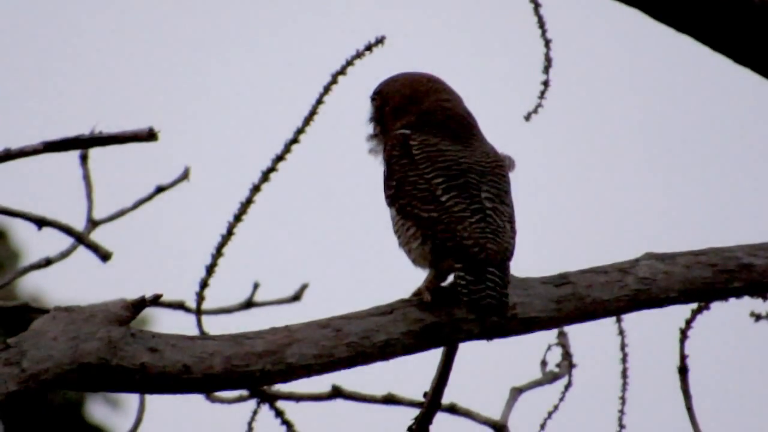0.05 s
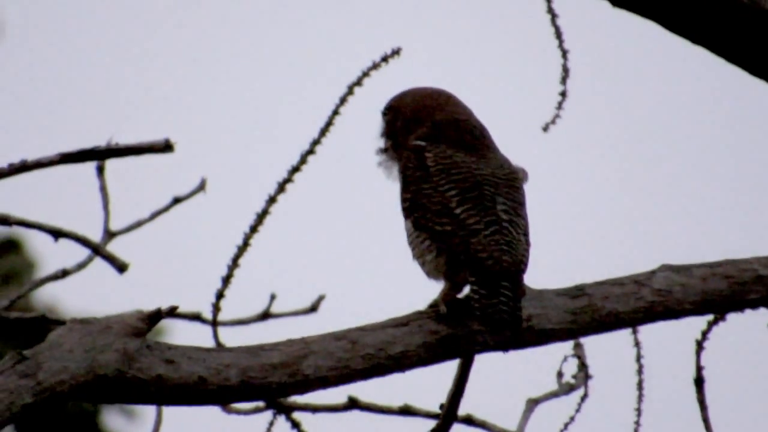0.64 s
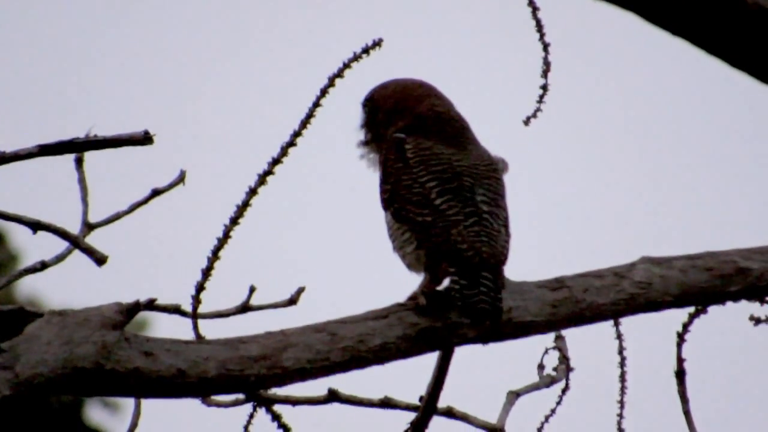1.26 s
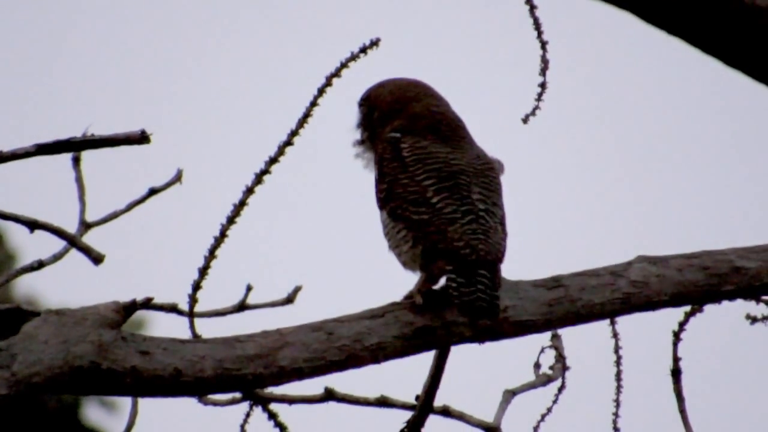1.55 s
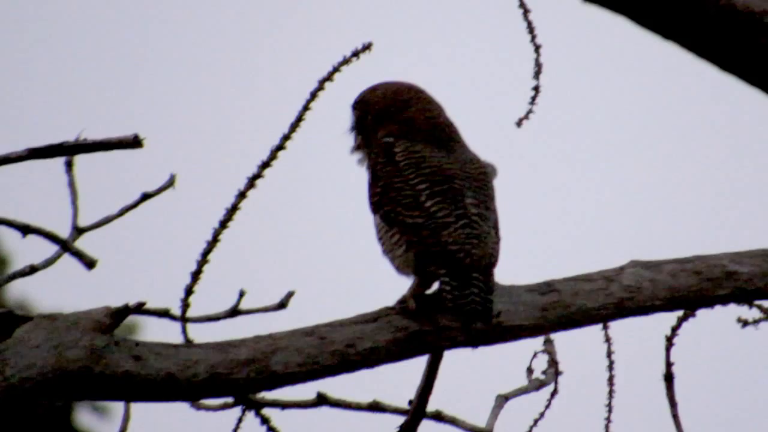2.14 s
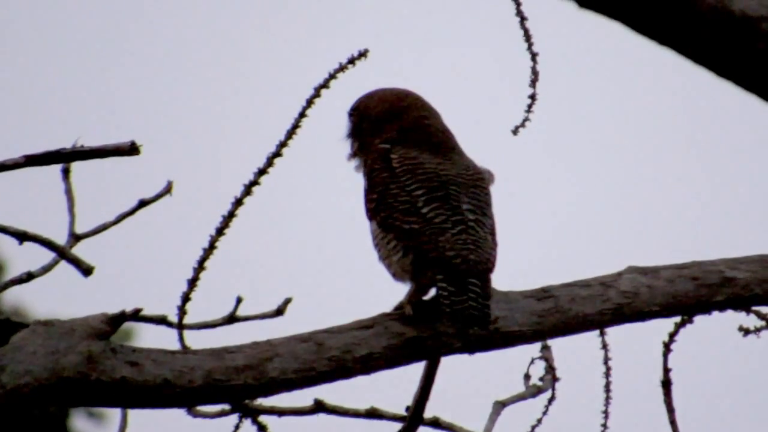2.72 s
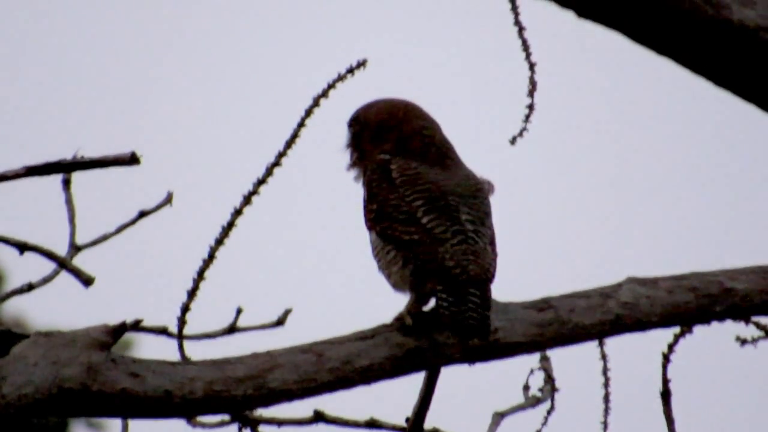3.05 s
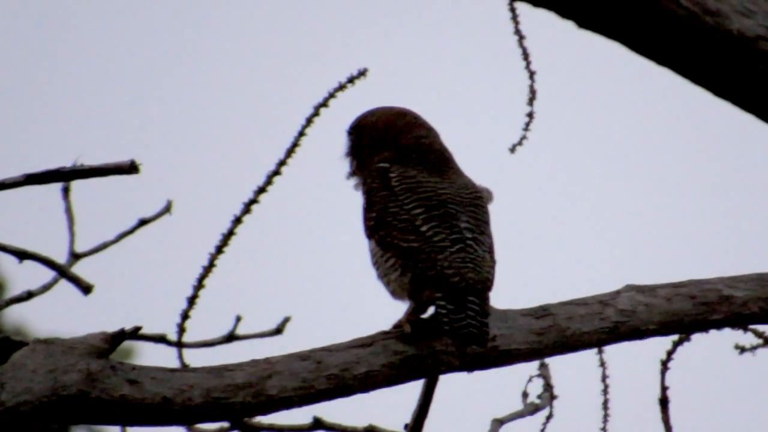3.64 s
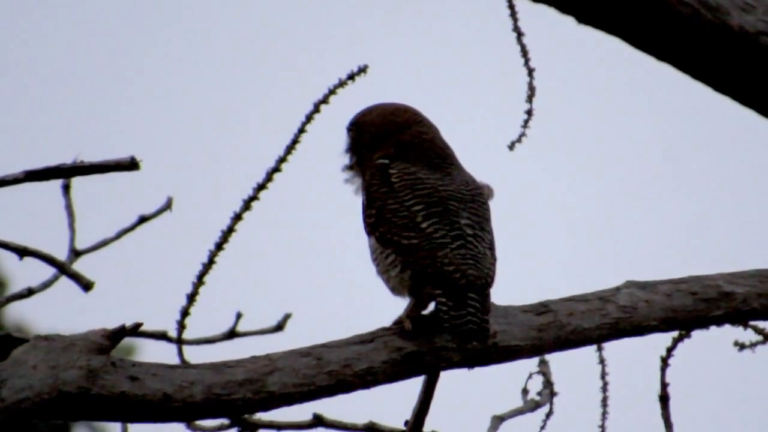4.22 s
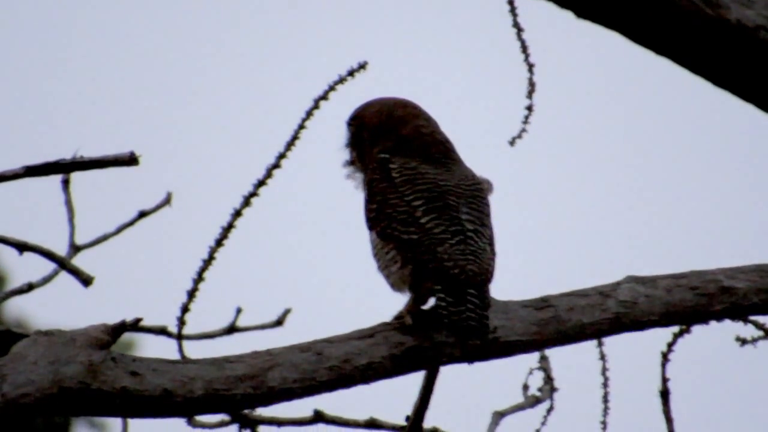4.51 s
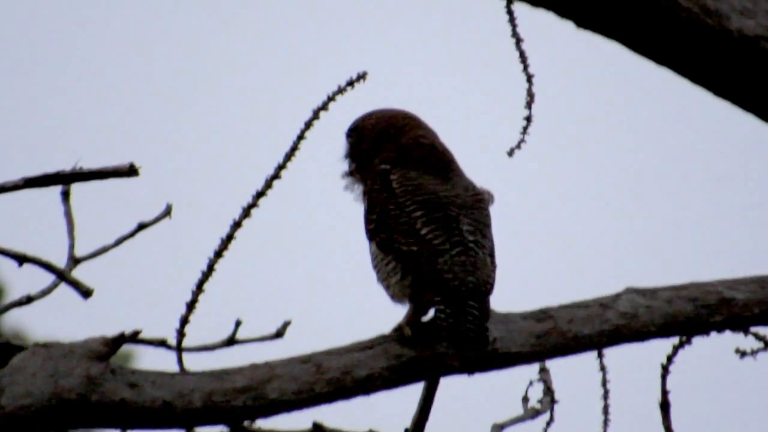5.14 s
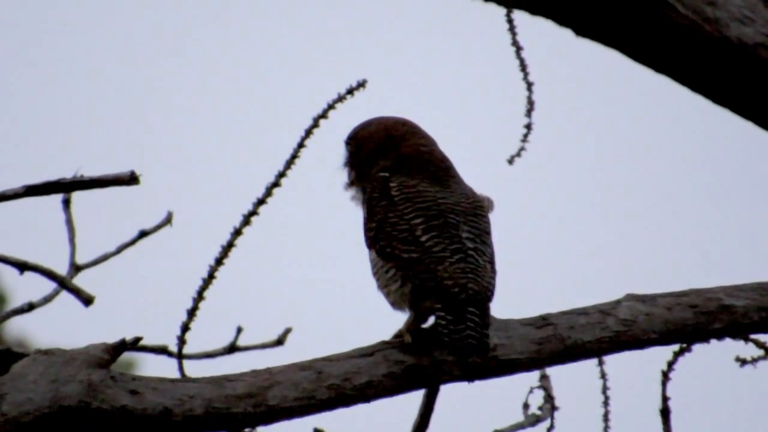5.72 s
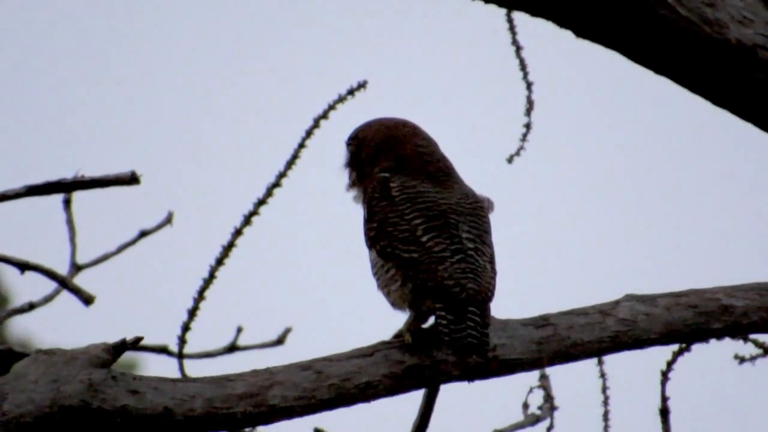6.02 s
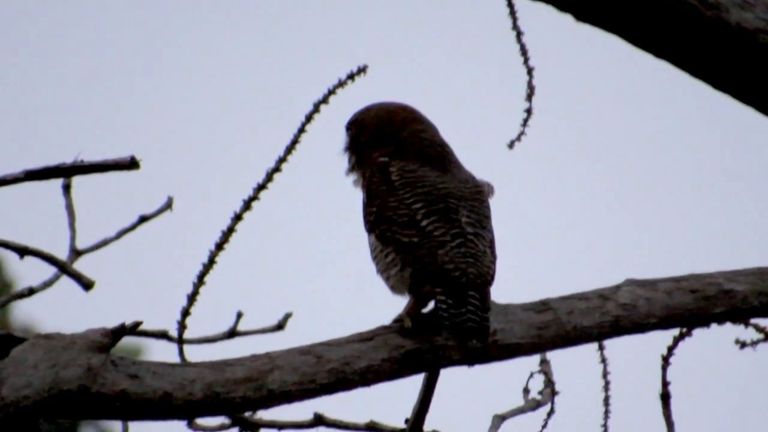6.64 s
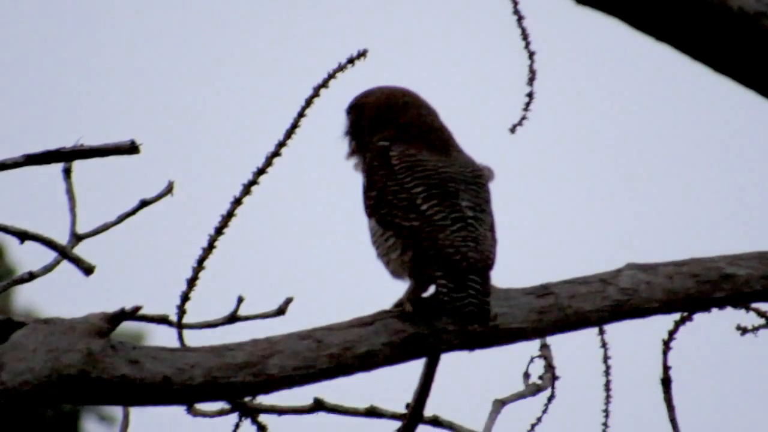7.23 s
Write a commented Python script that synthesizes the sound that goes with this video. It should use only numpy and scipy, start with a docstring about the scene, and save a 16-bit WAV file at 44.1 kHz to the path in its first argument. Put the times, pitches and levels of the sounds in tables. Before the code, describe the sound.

A small owl calls from a tree, clear and fairly close: four short warbled hoots about half a second apart, a pause, then three slightly softer ones. Each note rings briefly through the wood. A cricket chirps evenly throughout over a thin, shrill insect chorus. Faint distant birds, far engine hum and a soft rush of air fill the background, heard through a stereo microphone with no deep bass.

```python
"""Jungle owlet at dusk

An owlet gives two bouts of warbled notes: each opens with a rasp of the syrinx, is filtered by the
throat and bill, and reverberates among the trees. Crickets chirp by scraping their wings, a
bush-cricket ticks high above them, and far birds call faintly over engine drones and a low rush.
A camera's stereo microphone hears it all through a steep wind filter."""
import sys
import numpy as np
from scipy import signal
from scipy.fft import rfft, irfft
from scipy.io import wavfile

SR = 44100
rng = np.random.default_rng(int(sys.argv[2]) if len(sys.argv) > 2 else 0)


def transcribe(signal):
    """Save signal, clipped to [-1, 1], as a 16-bit WAV file at the path in sys.argv[1]."""
    frames = np.atleast_2d(signal).T
    limited = np.clip(frames, -1, 1)
    pcm = np.round(limited * 32767).astype(np.int16)
    wavfile.write(sys.argv[1], SR, pcm)


N = 320607
TIME = np.arange(N) / SR
FREQ = np.arange(N // 2 + 1) * SR / N
LOW_CUT_HZ, HIGH_CUT_HZ = 319, 15720


# The owlet's notes: start_s, length_s, gain_db, pitch_hz, rise_hz, warble_crest_s, rasp_db
OWLET_NOTES = [(0.184, 0.15, -13.5, 1056, -66, 0.2555, -32), (0.653, 0.13, -13.9, 1041, -41, 0.7273, -33),
               (1.148, 0.14, -13.5, 1055, -103, 1.2208, -35), (1.619, 0.14, -14, 1062, 45, 1.6997, -38.5),
               (4.326, 0.1855, -16.5, 1060, -8, 4.4276, -37.5),
               (4.985, 0.16, -15.5, 1057, -48.5, 5.086, -36), (5.487, 0.15, -14.5, 1051, 68, 5.5725, -56)]
# Excess of the direct sound on the left: frequency_hz, pan_db
OWLET_LEFT_EXCESS = [(500, 1), (1100, 2.4), (2100, 4.8), (8000, 1.5)]
def owlet(ground_delay_s=0.01, ground_db=-22, leaves_hz=2600):
    """Multipath propagation: the direct call, a ground reflection and the reverberation of the wood."""
    voice = np.zeros(N)
    for *note, rasp_db in OWLET_NOTES:
        add(voice, note[0], hoot(*note))
        add(voice, note[0] - .008, rasp(rasp_db))
    dull = shape(voice, resonance(FREQ, 0, leaves_hz))  # earth and leaves absorb treble
    early = voice + undb(ground_db) * np.interp(TIME - ground_delay_s, TIME, dull)
    near = undb(-15) * trees(dull, t60_s=0.28, coherence=0.7)
    far = undb(-19.5) * trees(dull, t60_s=0.92, coherence=0.87, build_s=0.019)
    return place(early, contour(OWLET_LEFT_EXCESS, FREQ), lag_s=.000028) + near + far


# The arch of every note: length_fraction, pitch_offset_hz, gain_db
NOTE_ARCH = [(0, -72.5, -8.5), (.11, -8, -2), (.3, 1, 0.5), (.55, 12, 1.5), (0.852, 0, 2),
             (0.948, -36, -1.5), (1, -60, -12)]
# Transfer function of throat and bill: frequency_hz, gain_db
THROAT_RESPONSE = [(900, -11), (1000, -4.5), (1065, -0.5), (1150, 1), (1500, -4), (1950, -21), (2300, -32),
                   (2600, -22), (2850, -36), (3100, -49.5), (3400, -42), (3900, -44.5), (4700, -53),
                   (5300, -42), (7200, -61)]
# High resonances of the bill: centre_hz, width_hz, gain_db
BILL_RESONANCES = [(8500, 1030, -35.5), (11180, 1800, -38), (15200, 1200, -44)]
def hoot(start, length, db, pitch_hz, rise_hz, crest_s, full_depth_hz=114, full_db=-13.5):
    """Frequency modulation: a warble sweeps the harmonics of a whistle through the throat resonances."""
    t = TIME[:int(length * SR)]
    fraction, offset_hz, arch_db = np.transpose(NOTE_ARCH)
    # a harder push makes the note louder, more deeply warbled and brighter
    depth_hz = full_depth_hz * undb(1.48 * (db - full_db))
    from_crest_s = start + t - crest_s
    swing_hz = depth_hz * np.exp(-(from_crest_s / (0.43 * length)) ** 2)
    brightness = undb(3 * (swing_hz / 80 - 1))
    warble_hz = swing_hz * np.cos(2 * np.pi * 33.6 * from_crest_s)
    hz = pitch_hz + rise_hz * (t / length - .5) + np.interp(t / length, fraction, offset_hz) + warble_hz
    hz *= 1 + 0.0011 * walk(740, len(t))
    phase = phase_of(hz)
    tone = undb(contour(THROAT_RESPONSE, hz)) * np.sin(phase)
    for k in range(2, 16):
        throat = undb(contour(THROAT_RESPONSE, k * hz)) * (k * hz < THROAT_RESPONSE[-1][0])
        bill = sum(undb(gain_db) * resonance(k * hz, centre, width / 2) ** 2
                   for centre, width, gain_db in BILL_RESONANCES)
        flutter = undb(2.0 * np.log(k) * walk(393.3, len(t)))
        blur = .06 * k * walk(900, len(t))
        tone += brightness * (throat + bill) * flutter * np.sin(k * phase + blur)
    # a note that climbs in pitch starts softly and swells
    held_back_db = 0.022 * rise_hz * np.maximum(1 - 2 * t / length, 0)
    edges = np.clip(np.minimum(t, length - t) / 0.0028, 0, 1)
    return tone * undb(db + np.interp(t / length, fraction, arch_db) - held_back_db) * edges


# Throat modes rung by the rasp: frequency_hz, decay_s, gain_db
THROAT_MODES = [(676, 0.0034, -6), (770, 0.00045, -15), (1110, 0.0008, 17.5), (1410, 0.0011, -10.5),
                (1750, 0.0035, -14)]
def rasp(db, gap_s=0.0022, growth_db=2, count=4):
    """Impulse excitation: uneven, growing slaps of the syrinx ring the damped modes of the throat."""
    slaps = gap_s * (np.arange(count) + .5 * rng.random(count))
    age = np.maximum(TIME[:SR // 50] - slaps[:, None], 0)
    ring = sum(undb(mode_db) * np.sin(2 * np.pi * hz * age) * np.exp(-age / decay)
               for hz, decay, mode_db in THROAT_MODES)
    attack = 1 - np.exp(-(age / 0.00059) ** 2)
    return level(undb(growth_db * np.arange(count)) @ (ring * attack), db)


def lingering_ring(ago_s=0.34, gain_db=-22):
    """Reverberant decay: the wood still rings with a note sung just before the scene opens."""
    note = np.zeros(N)
    add(note, 0, hoot(*OWLET_NOTES[0][:-1]))
    dull = shape(note, resonance(FREQ, 0, 2600))
    ring = undb(gain_db) * trees(dull, t60_s=1.0, coherence=0.86)
    return np.array([np.interp(TIME + ago_s, TIME, side, right=0) for side in ring])


# Resonance of a cricket's wing: frequency_hz, gain_db
WING_RESPONSE = [(4800, -38.5), (5400, -23.5), (5700, -11), (6000, -3), (6250, 1.5), (6500, -3.5),
                 (6800, -12), (7100, -30.5), (7600, -42)]
def cricket(stroke_hz=99, chirp_sigma_s=0.041, scatter_db=0.7):
    """Stridulation: rapid scraping strokes excite the wing resonance and swell into regular chirps."""
    chirps = beats(first_s=0.095, every_s=0.2486, slip_s=0.0025)
    gains = undb(-40 + scatter_db * rng.standard_normal(len(chirps)))
    swell = sum(gain * np.exp(-((TIME - peak_s) / chirp_sigma_s) ** 2 / 2)
                for peak_s, gain in zip(chirps, gains))
    cycle = np.cumsum(stroke_hz * (1 + 0.068 * walk(25))) / SR % 1
    scrape = np.exp(-cycle / 0.59) * rng.standard_normal(N)
    song = level(shape(scrape, undb(contour(WING_RESPONSE, FREQ))), -8) * swell
    return place(song, pan_db=-4.5) + undb(-2.5) * trees(song, t60_s=0.048, coherence=.1)


def cricket_chorus():
    """Incoherent summation: many crickets merge into one shrill band, with a faint octave above it."""
    band = undb(contour(WING_RESPONSE, FREQ)) + undb(-25.5) * resonance(FREQ, 12550, 400)
    return level(shape(rng.standard_normal((2, N)), band), -44.0) * undb(walk(16))


def bush_cricket(rate_hz=101, base_hz=12550, climb_hz=500, fall_hz=1200, tick_s=0.0069, count=9):
    """Pulse trains: each tick is a short downward sweep, a little higher than the one before."""
    ticks, t = np.zeros(N), TIME[:int(tick_s * SR)]
    for start in beats(first_s=0.039, every_s=0.24294, slip_s=0.003):
        for k in range(count):
            centre_hz = base_hz + climb_hz * np.sqrt(k / count)
            hz = centre_hz + fall_hz * (.5 - t / tick_s) + 330 * walk(3000, len(t))
            tick = np.hanning(len(t)) * np.sin(phase_of(hz))
            add(ticks, start + k / rate_hz, tick * undb(0.87 * rng.standard_normal()))
    ticks = level(ticks, -67.5)
    return place(ticks, pan_db=-1) + undb(-2.0) * trees(ticks, t60_s=0.11, coherence=.1)


# Drawn-out cries: start_s, length_s, pitch_hz, glide_hz, source_db, throat_hz, roughness_fraction
BIRD_CRIES = [(2.08, 0.125, 1798, 66, -59.5, 1800, 0.026), (2.246, 0.23, 1315, -28, -58.5, 1330, 0.04),
              (2.574, 0.24, 1428, 280, -59.5, 1400, 0.075), (2.584, 0.3, 575, -29, -58, 560, 0.067),
              (3.76, 0.084, 1128, -120, -54, 1190, 0.045), (4.856, 0.18, 648, -46, -59, 634, 0.064),
              (5.154, 0.16, 541, -9, -59, 540, 0.013), (5.703, 0.22, 537, -4.5, -65, 1780, 0.017),
              (6.743, 0.113, 514.5, 44, -58.5, 1190, 0.034), (6.843, 0.22, 581.4, 15, -54.5, 1250, 0.015),
              (7.04, 0.064, 2870, 160, -63.5, 2850, 0.012), (7.16, 0.21, 498, -5.5, -54.5, 1160, 0.005)]
# Sharp falling chips: start_s, pitch_hz, source_db
BIRD_CHIPS = [(6.327, 2030, -63), (6.607, 1647, -56), (6.859, 1753, -51.5), (7.105, 1830, -53.5)]
# A small bird's phrases, each a thin whistle and then a falling slur: start_s
BIRD_PHRASES = [2.39, 5.55]
def far_birds():
    """Direct and diffuse sound: about half of each distant call arrives by way of the trees."""
    calls = np.zeros(N)
    for start, *note in BIRD_CRIES:
        add(calls, start, cry(*note))
    for start, hz, db in BIRD_CHIPS:
        add(calls, start, cry(0.0217, hz, glide_hz=-420, db=db, throat_hz=hz, roughness=0.039))
    for start in BIRD_PHRASES:
        whistle = cry(0.16, 5250, glide_hz=-170, db=-64, throat_hz=5250, roughness=0.008)
        slur = cry(0.08, 4150, glide_hz=-2197, db=-64.5, throat_hz=4150, roughness=0.068)
        add(calls, start, whistle)
        add(calls, start + 0.325, slur)
    return undb(1.5) * place(calls, pan_db=-2.5) + undb(2.0) * trees(calls, t60_s=0.97, coherence=0.29)


def cry(length, pitch_hz, glide_hz, db, throat_hz, roughness):
    """Source and filter: the harmonics of a wavering glide pass through one throat resonance."""
    t = TIME[:int(length * SR)]
    hz = (pitch_hz + glide_hz * (t / length - .5)) * (1 + roughness * walk(309.7, len(t)))
    phase = phase_of(hz)
    tone = sum(resonance(k * hz, throat_hz, 0.34 * throat_hz) * np.sin(k * phase)
               for k in range(1, 7) if k * pitch_hz < HIGH_CUT_HZ)
    return level(tone * np.sqrt(np.hanning(len(t))), db)


# Far engine notes: start_s, length_s, pitch_hz, glide_hz, gain_db
ENGINE_NOTES = [(0.0, 0.61, 327.7, 0.5, -48.5), (0.7, 3.9, 361.8, -6, -51.5),
                (5.153, 0.7, 338.3, -20.5, -50.5), (6.6, 0.62, 376.4, 4.5, -54.5)]
def far_engines(waver=0.0037):
    """Slow amplitude modulation: faint engine tones fade in and out on the air."""
    drones = np.zeros(N)
    for start, length, pitch_hz, glide_hz, db in ENGINE_NOTES:
        t = TIME[:int(length * SR)]
        hz = (pitch_hz + glide_hz * (t / length - .5)) * (1 + waver * walk(20, len(t)))
        add(drones, start, undb(db) * np.sqrt(np.hanning(len(t))) * np.sin(phase_of(hz)))
    return drones * undb(0.75 * walk(8.3))


# Spectrum of the open air: frequency_hz, relative_density_db
AIR_SPECTRUM = [(250, -8), (340, 2), (430, -4), (520, -8), (600, -9.5), (750, -15.5), (1200, -13.5),
                (1700, -16.5), (2400, -20), (5000, -23), (7500, -25.5), (11500, -27.5), (13600, -29),
                (15700, -29)]
# Likeness of left and right: frequency_hz, coherence_fraction
AIR_COHERENCE = [(380, .97), (640, .7), (1400, .4), (3000, .03), (15000, .08)]
# The low rush swells, then eases off: time_s, gain_db
RUSH_SWELL = [(4.2, -1.5), (5.4, 0.5), (6.2, -3.5)]
def open_air(lag_s=.00012):
    """Partial coherence: a low rush reaches both channels from the left, under a diffuse hiss."""
    coherence = np.clip(contour(AIR_COHERENCE, FREQ), 0, 1)
    colour = undb(contour(AIR_SPECTRUM, FREQ)) * (FREQ > LOW_CUT_HZ / 2)
    shared = place(shape(rng.standard_normal(N), colour * np.sqrt(coherence)), 0, lag_s)
    rush = shared + shape(rng.standard_normal((2, N)), colour * np.sqrt(1 - coherence))
    low = shape(rush, resonance(FREQ, 0, 1200))
    sway = undb(0.14 * walk(3.23) + np.interp(TIME, *np.transpose(RUSH_SWELL)))
    return level(rush + low * (sway - 1), -48)


def trees(x, t60_s, coherence, build_s=0.02):
    """Multiple scattering: trunks and leaves return a dense tail that builds up and dies away."""
    t = TIME[:SR]
    envelope = (1 - np.exp(-t / build_s)) * np.exp(-np.log(1000) * t / t60_s)
    mid, side = rng.standard_normal((2, SR)) * envelope
    tails = [np.sqrt(1 + coherence) * mid + sign * np.sqrt(1 - coherence) * side for sign in (1, -1)]
    return np.array([signal.fftconvolve(x, tail / np.linalg.norm(tail))[:N] for tail in tails])


def place(x, pan_db, lag_s=0):
    """Stereo localisation: the left channel is louder by pan_db and earlier by lag_s."""
    delay = np.exp(-2j * np.pi * FREQ * lag_s)
    return np.array([shape(x, undb(pan_db / 2)), shape(x, undb(-pan_db / 2) * delay)])


def undb(db):
    """Amplitude ratio from decibels."""
    return 10 ** (np.asarray(db) / 20)


def level(x, db):
    """Normalisation to an rms level."""
    return x * undb(db) / np.sqrt(np.mean(x ** 2))


def contour(points, hz):
    """Interpolation of (frequency_hz, value) points on a log-frequency axis."""
    point_hz, value = np.transpose(points)
    return np.interp(np.log(hz + 1), np.log(point_hz), value)


def shape(x, gain):
    """Filtering as multiplication of the spectrum."""
    return irfft(rfft(x) * gain, N)


def resonance(hz, centre_hz, half_width_hz):
    """Lorentzian gain curve; centred on zero, it is a low-pass."""
    return 1 / (1 + ((hz - centre_hz) / half_width_hz) ** 2)


def phase_of(hz):
    """Phase as the integral of frequency."""
    return 2 * np.pi * np.cumsum(hz) / SR


def walk(rate_hz, size=N):
    """Random modulation: straight lines join Gaussian values drawn at rate_hz."""
    at = np.arange(size) * rate_hz / SR
    count = int(at[-1]) + 2
    return 0.86 * np.interp(at, np.arange(count), rng.standard_normal(count))


def beats(first_s, every_s, slip_s):
    """Timing jitter: an even beat, each time a little early or late."""
    times = np.arange(first_s, N / SR, every_s)
    return times + slip_s * rng.standard_normal(len(times))


def add(track, start_s, sound):
    """Superposition of a sound on a track."""
    i = int(np.clip(start_s * SR, 0, N))
    track[i:i + len(sound)] += sound[:N - i]


def scene():
    """Superposition: the owlet over insects, far birds, engines and open air."""
    return (owlet() + lingering_ring() + cricket() + cricket_chorus() + bush_cricket()
            + far_birds() + far_engines() + open_air())


def record(dry):
    """Band limiting: the camera's wind filter removes the bass, and the top is cut steeply."""
    wind_filter = undb(np.interp(FREQ - LOW_CUT_HZ, [-12, 4], [-48, 0]))
    high_cut = np.clip((HIGH_CUT_HZ - FREQ) / 100 + .5, 0, 1)
    return shape(dry, wind_filter * high_cut)


dry = scene()
out = record(dry)
transcribe(out)
```